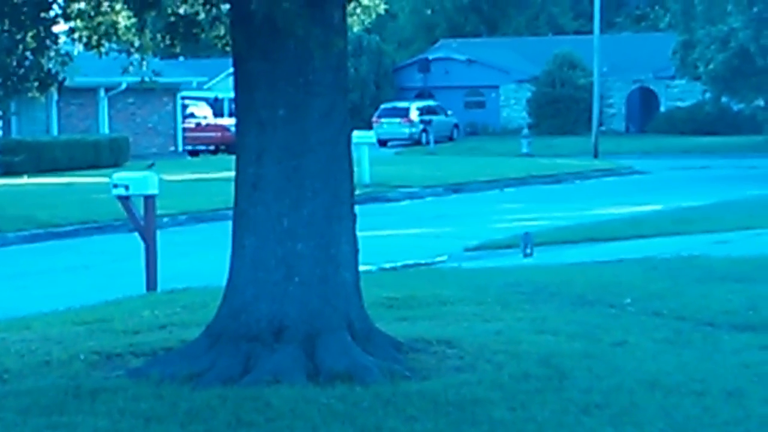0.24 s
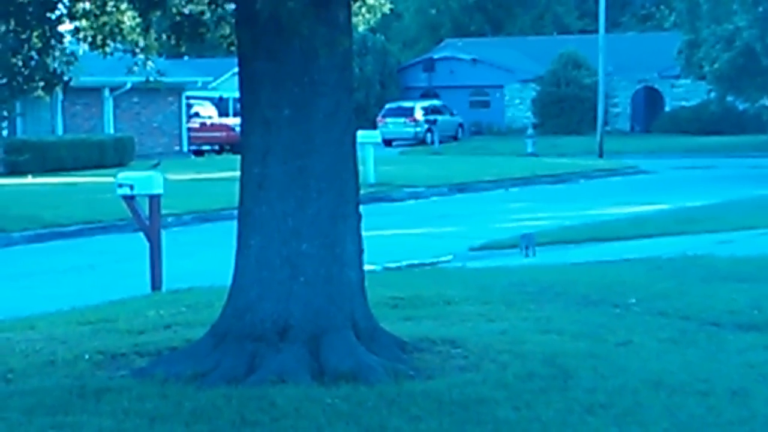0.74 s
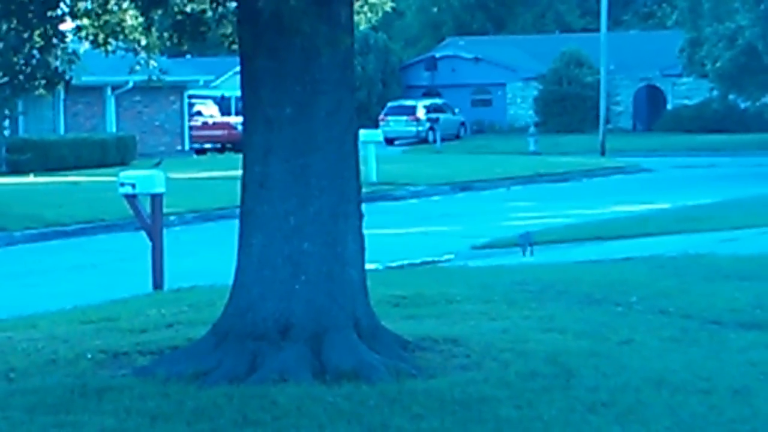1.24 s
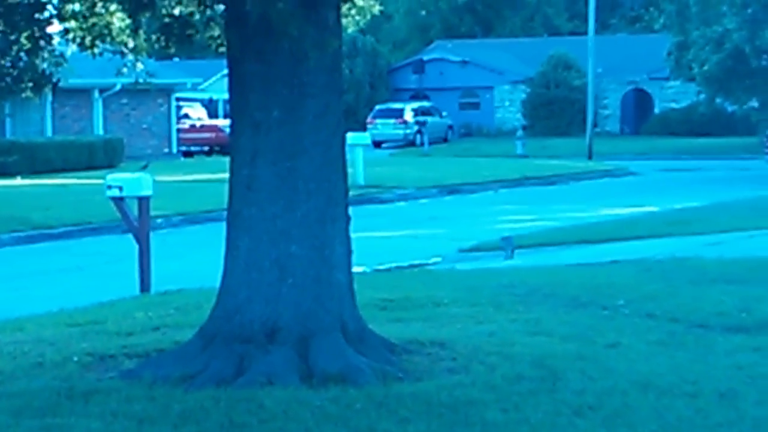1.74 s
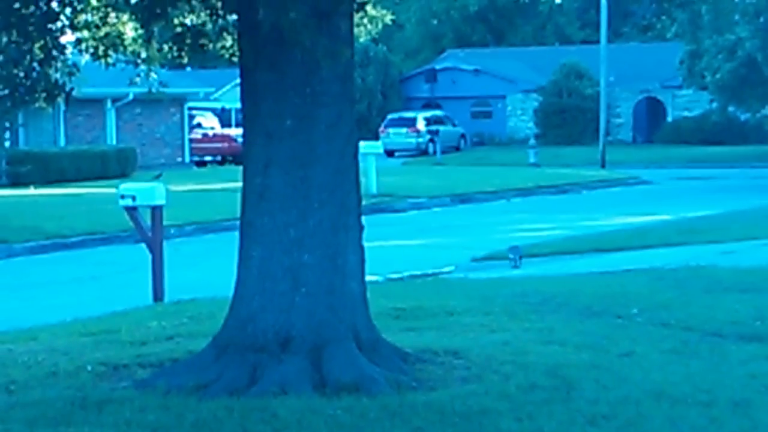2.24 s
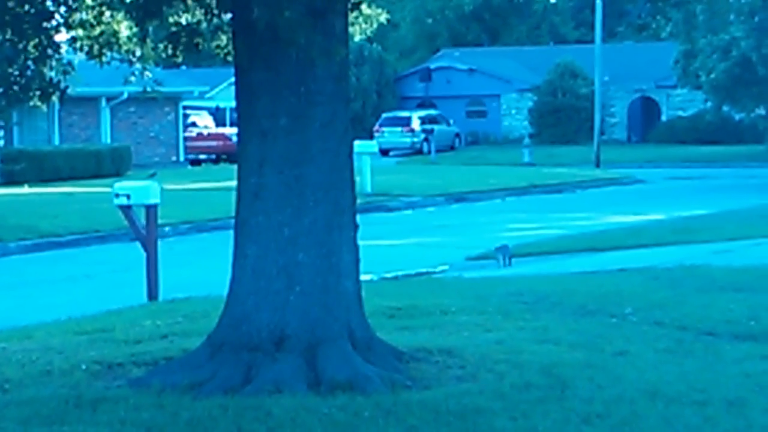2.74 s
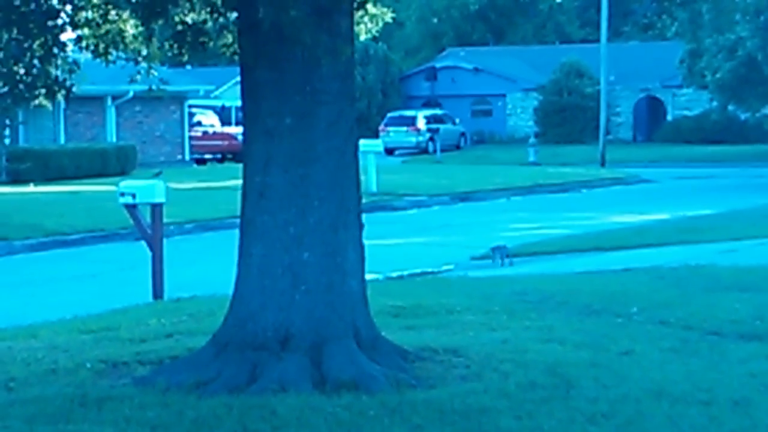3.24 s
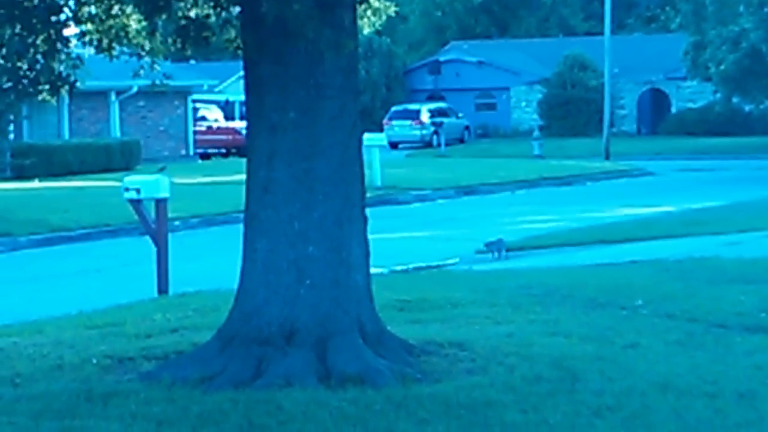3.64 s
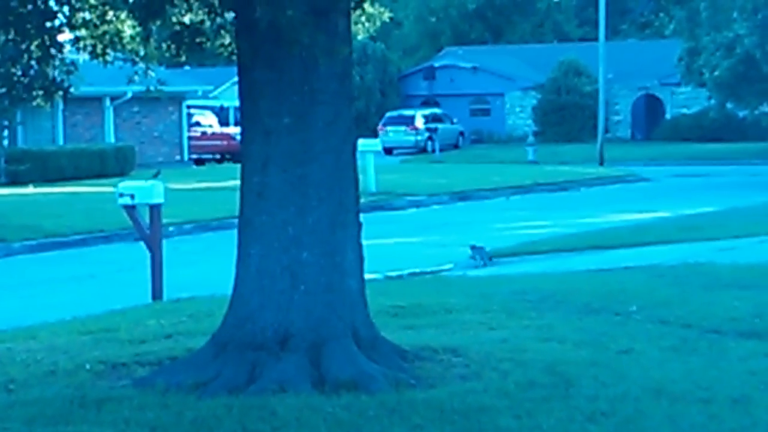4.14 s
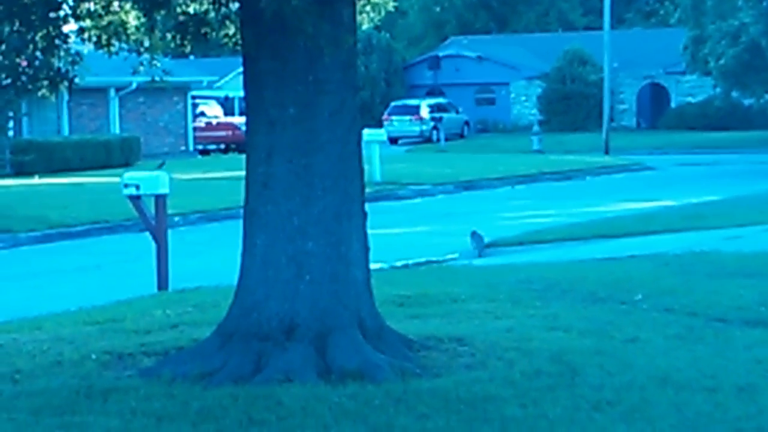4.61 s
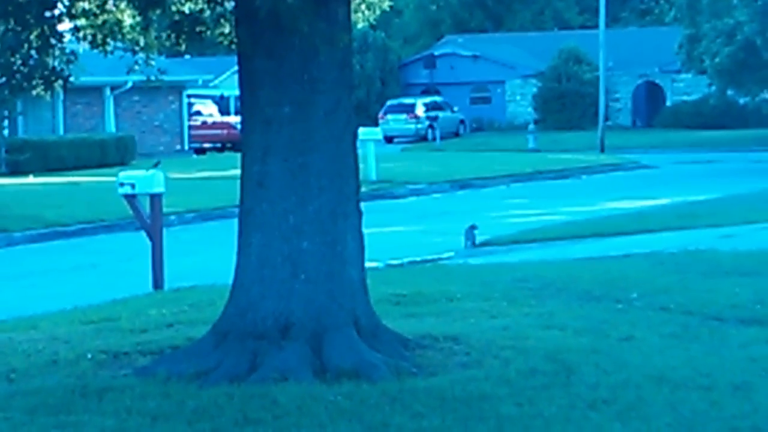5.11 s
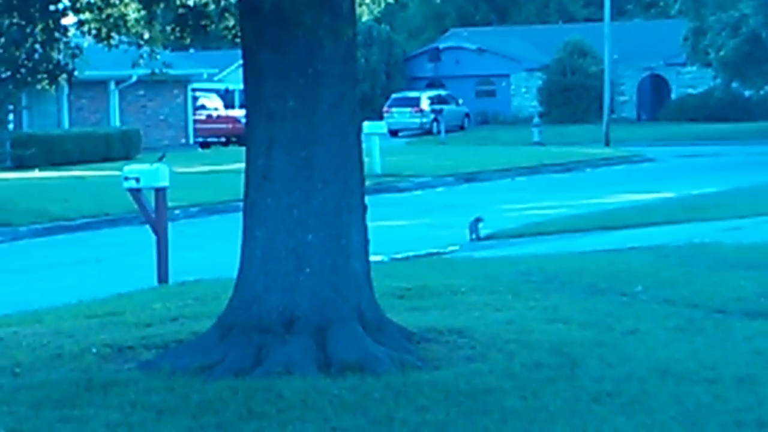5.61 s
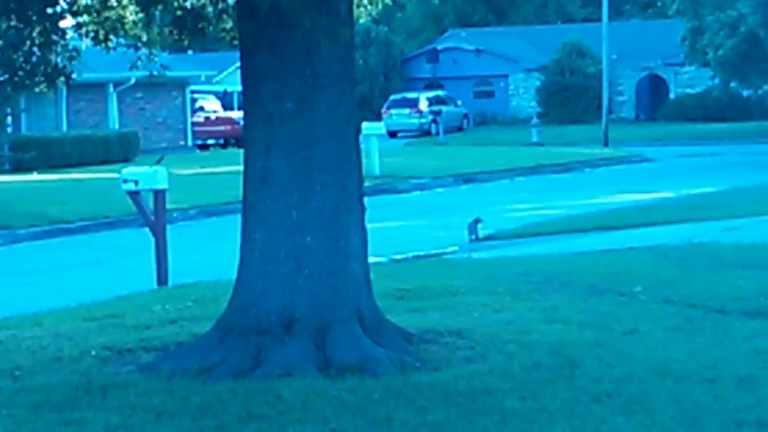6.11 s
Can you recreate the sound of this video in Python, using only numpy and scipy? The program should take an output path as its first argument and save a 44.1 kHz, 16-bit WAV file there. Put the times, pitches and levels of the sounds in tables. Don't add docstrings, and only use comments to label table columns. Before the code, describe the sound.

A quiet suburban street through a small mono microphone: low wind bumps, faint far traffic, a steady low air-conditioner hum, and a heavy vehicle idling softly with a thin air leak. From 0.1 s a songbird gives short sliding whistles. At 0.8 s a jay scolds, a very brief harsh buzzing rasp that darkens as it ends and echoes off house fronts. More whistles follow, with a dull knock near 1.25 s and a soft air puff at 1.7 s. Around 1.95 s a brake valve cracks, blows a sharp hiss at 2.0 s, then squeaks very high at 2.3 s. The second scold comes at 2.55 s. Small valve puffs, faint distant chirps and stronger wind thumps near 3.9 and 4.5 s fill the gap. The third scold, at 4.65 s, echoes most. Sparse far birds chirp around 5.6-5.9 s; the loudest, driest scold lands at 6.25 s, just before the end.

```python
import sys
import numpy as np
from scipy import signal
from scipy.fft import rfft, irfft, next_fast_len
from scipy.io import wavfile
from scipy.ndimage import uniform_filter1d, map_coordinates

SR = 44100
rng = np.random.default_rng(int(sys.argv[2]) if len(sys.argv) > 2 else 0)


def to_wav(sig):
    pcm = np.clip(np.atleast_2d(sig), -1, 1) * 32767
    pcm = np.round(pcm).astype(np.int16)
    wavfile.write(sys.argv[1], SR, pcm.T)


def gain_from_decibels(decibels):
    exponent = np.asarray(decibels, float) / 20
    return 10 ** exponent


N = 280379

# time_s, level_db
TRAFFIC_LEVEL = [(0, -59), (1.3, -60.5), (1.8, -59.5), (2.6, -62), (4.5, -59), (5.1, -61.5), (6.36, -58.5)]
# pitch_hz, level_db (per Hz)
TRAFFIC_COLOUR = [(100, -42), (170, -4.5), (204, -8), (225, -4), (245, -9.5), (260, -11), (303, -1.5),
                  (386, -9), (540, -12), (757, -23.5), (927, -15.5), (1080, -26), (1340, -20.5),
                  (1570, -33.5), (1700, -32.5), (2210, -57.5), (3740, -120)]
# pitch_hz, level_db (per Hz)
HIGH_FLOOR_COLOUR = [(940, -32), (1600, -10.5), (1880, 2), (2410, -9.5), (2730, -8.5), (3150, -16),
                     (3240, -15), (4620, -10.5), (6210, -11), (8340, -14.5), (11300, -19), (14900, -15.5),
                     (15700, -16)]
# pitch_hz, width_hz, level_db (rms)
HUM = [
    (236.6, 8, -57.5),
    (297.8, 22, -63.5),
]
# time_s, boost_db
FAN_SURGES = [
    (3.79, 8.7),
    (4.19, 13.6),
]
# pitch_hz, level_db (per Hz)
WIND_COLOUR = [(8.8, -46), (15, -10.5), (40, -2.5), (87, 1), (157, -7.5), (168, -13.5), (203, -26.5),
               (220, -15.5), (290, -34.5), (480, -120)]
# start_s, length_s, level_db
GUSTS = [(0.06, 0.044, -50), (0.186, 0.038, -50), (0.715, 0.034, -46), (0.823, 0.095, -41.5),
         (0.99, 0.052, -43.5), (1.07, 0.032, -46), (1.255, 0.035, -46), (1.349, 0.17, -42.5),
         (1.581, 0.03, -47), (1.701, 0.073, -39.5), (1.836, 0.028, -52), (1.898, 0.1, -41.5),
         (2.014, 0.15, -43), (2.434, 0.025, -54), (2.6, 0.12, -49.5), (2.75, 0.066, -45),
         (2.947, 0.039, -50), (3.04, 0.064, -49), (3.458, 0.077, -45.5), (3.574, 0.093, -44),
         (3.855, 0.1, -37.5), (4.034, 0.042, -44), (4.389, 0.032, -41), (4.456, 0.12, -35),
         (5.518, 0.04, -49), (5.567, 0.08, -41.5), (5.711, 0.097, -41.5), (6.152, 0.079, -48.5),
         (6.222, 0.068, -47)]

# time_s, level_db
IDLE_LEVEL = [(0, -51.5), (.2, -53), (.33, -44.5), (.8, -58), (1.09, -53.5), (1.5, -57), (2, -71.5),
              (6.36, -62)]
# time_s, level_db
LEAK_LEVEL = [(0, -62.5), (.4, -65), (.75, -67.5), (1.4, -72.5), (1.9, -70.5), (2.33, -61), (2.55, -70),
              (3.05, -75.5), (3.6, -81), (4.3, -94), (6.36, -92)]
# pitch_hz, level_db (per Hz)
LEAK_COLOUR = [(2350, -35), (4000, -11), (4780, -16), (5170, -6), (6580, -2), (7290, 3), (8080, 4),
               (10800, -7), (15100, -14.5), (15700, -14)]
# start_s, level_db, fade_s (time to fall 60 dB)
PUFFS = [(1.247, -61, .06), (1.71, -60, 0.78), (2.25, -82, .9), (3.12, -73, 0.27), (3.24, -69.5, .6),
         (3.41, -71.5, .5), (3.775, -71.5, 1.4), (4.37, -69.5, 1.6), (6.1, -75, .5)]
# pitch_hz, level_db (per Hz)
PUFF_COLOUR = [(300, -120), (450, 3), (700, 1), (1500, 5), (3000, -10), (5000, -2), (7500, 1.5),
               (10000, -3.5), (13000, -16), (15700, -21)]
# start_s, level_db, pitch_hz, fade_s (time to fall 60 dB)
KNOCK = (1.247, -44, 520, 0.08)
# pitch_hz, level_db (per Hz)
VENT_CHEST = [(210, -33), (350, -16), (438, -2.5), (660, 0), (769, -6), (961, -2), (1380, -5.5),
              (1590, -12), (1970, -9.5), (5410, -25), (5800, -15.5), (7540, -44), (12800, -120)]
# pitch_hz, level_db (per Hz)
VENT_JET = [(3500, -27), (4800, -11), (5600, -32), (6600, 5), (8000, 3), (9000, -6), (11000, -6.5),
            (12800, -21), (14500, -15), (15700, -18)]
# time_s, pitch_hz, level_db
SQUEAK = [(2.25, 11200, -90), (2.262, 11210, -53), (2.29, 11200, -50.5), (2.34, 11230, -53.5),
          (2.44, 11200, -76)]

# pitch_hz, fade_s (time to fall 60 dB)
STREET_FADE = [(1500, 0.46), (3500, 0.64), (6000, 0.62), (8000, 0.64), (11000, 0.73), (15000, 0.76)]
# delay_s, level_db, pitch_hz, width_hz
HOUSES = [(.042, -12, 4900, 1490), (.075, -19, 4000, 1500), (0.109, -11.5, 4380, 3000),
          (.116, -8, 3650, 900), (.2, -19, 4230, 1500), (.214, -12.5, 3540, 587), (.245, -33, 4250, 1200),
          (.356, -19.5, 5180, 500), (0.357, -26, 3900, 396)]
# pitch_hz, level_db
ECHO_COLOUR = [(1500, 3.5), (2600, -6), (3200, -7.5), (3600, -4), (4100, 3), (4700, -6), (5200, -6),
               (5900, -3.5), (8000, 4), (11000, -4.5), (15000, 5)]

# start_s, length_s, start_pitch_hz, end_pitch_hz, level_db (rms)
SONG = [(0.111, 0.05, 2170, 2040, -62.5), (0.261, 0.07, 2710, 3150, -59.5), (0.317, .06, 2580, 2414, -58.5),
        (0.386, 0.053, 2420, 2275, -70), (0.432, .025, 2257, 2225, -55), (0.714, 0.038, 3600, 3220, -65),
        (0.744, 0.028, 3150, 2890, -52), (0.767, 0.071, 2600, 2556, -46.5), (0.863, 0.013, 1700, 1780, -56),
        (1.128, 0.14, 2137, 1978, -56), (1.242, 0.037, 2468, 2350, -63.5),
        (1.271, 0.038, 2320, 1953, -50.5), (1.633, 0.062, 3070, 2700, -56),
        (1.661, 0.043, 2650, 2604, -46.5), (1.746, 0.052, 3005, 2760, -53), (1.774, 0.052, 2626, 2660, -43),
        (1.81, .08, 2567, 2396, -55.5), (2.185, 0.018, 2110, 2130, -66), (2.279, 0.086, 2457, 2508, -57),
        (2.36, .04, 3270, 3240, -62), (2.406, 0.052, 3220, 3120, -61.5), (2.446, 0.017, 2750, 3000, -54.5),
        (2.465, 0.019, 2650, 2550, -56.5), (2.475, .016, 2320, 2230, -63)]
# start_s, length_s, start_pitch_hz, end_pitch_hz, level_db (rms)
FAR_BIRDS = [(.054, 0.035, 3050, 2900, -76), (.97, 0.18, 509.5, 486.6, -64.5),
             (3.355, .06, 7150, 7000, -78), (3.657, .05, 2225, 2210, -71.5), (3.683, .03, 5950, 5250, -65),
             (3.728, 0.04, 2760, 2700, -73), (3.77, .05, 2650, 2430, -74), (5.63, 0.067, 2150, 2150, -74),
             (5.625, .08, 802, 906, -73), (5.718, .05, 2770, 2640, -77), (5.8, 0.059, 2220, 2120, -72),
             (5.874, .1, 2820, 2540, -76)]
# start_s, length_s, start_pitch_hz, end_pitch_hz, level_db (rms)
CHIPS = [(0.295, .055, 3210, 2900, -68), (3.679, .05, 5870, 5280, -69), (5.5, 0.052, 4600, 4500, -79.5),
         (5.798, .05, 3700, 4100, -81)]
FLUTTER = (0.39, .3, 0.74)

# start_s, peak_db, breath_hiss_db, length_stretch (ratio), house_echoes_db
SCOLDS = [
    (0.7766, -22, -0.5, 0.95, -5.5),
    (2.5539, -24, 1, 0.98, -1),
    (4.66, -22.5, -2, 0.96, 1.5),
    (6.2453, -18.5, 0.5, 0.92, -9.5),
]
# pitch_hz, width_hz, level_db
BEAK_WIDE = [(4275, 400, -4), (4660, 400, 1), (5150, 780, -3)]
# pitch_hz, width_hz, level_db
BEAK_HALF = [(3090, 244, -7), (3280, 274, -1), (3540, 250, 2), (3785, 207, 2), (3930, 310, -2)]
# pitch_hz, width_hz, level_db
BEAK_SHUT = [(1983, 120, -4.5), (2320, 113, -5), (2580, 140, -2), (3000, 64, -1)]
# pitch_hz, width_hz, level_db
BREATH_HISS = [(6020, 330, -2), (7640, 1320, 0), (8560, 840, 2.5), (11250, 1100, -5), (14500, 1800, -17.5)]
# loudest_s (after onset), level_db, swell_db_per_s, fade_db_per_s
POSTURES = [
    (.015, -2.5, 700, 620),
    (0.026, -2.5, 435, 524),
    (0.0382, -8.5, 1500, 420),
    (0.025, -10.5, 330, 417),
]


def unit(x):
    return x / np.sqrt(np.mean(x ** 2) + 1e-20)


def along(points, hz):
    f, v = np.transpose(points)
    return np.interp(np.log(hz + 1), np.log(f + 1), v)


def curves(rows, off=None):
    s, *cols = np.transpose(rows)
    return [np.interp(np.arange(N) / SR, s, c, left=off, right=off) for c in cols]


def wobble(rate, size=N):
    knots = rng.standard_normal(int(size * rate / SR) + 4)
    return map_coordinates(knots, [np.arange(size) * rate / SR])


def bell(s, width_s):
    return np.exp(-((np.arange(N) / SR - s) / width_s) ** 2)


def add(out, x, s):
    part = out[round(s * SR):][:len(x)]
    part += x[:len(part)]


def filtered(x, response):
    m = next_fast_len(len(x) + 8192)
    return irfft(rfft(x, m) * response(np.fft.rfftfreq(m, 1 / SR)), m)[:len(x)]


def resonances(modes):
    low = min(modes)[0]

    def response(f):
        edge = (f * f / (f * f - 0.63 * low * low - 1j * f * low)) ** 2
        total = 0
        for k, (centre, width, db) in enumerate(sorted(modes)):
            ring = 1j * f * width / (centre * centre - f * f + 1j * f * width)
            total = total + (-1) ** k * gain_from_decibels(db) * ring
        return edge * total
    return response


def rush(spectrum, patchy_db):
    z = signal.stft(rng.standard_normal(N + 512), nperseg=512)[2]
    patches = uniform_filter1d(rng.standard_normal(z.shape), 6, 0)
    patches = unit(uniform_filter1d(patches, 12, 1))
    x = signal.istft(z * gain_from_decibels(patchy_db * patches), nperseg=512)[1][:N]
    return unit(filtered(x, lambda hz: gain_from_decibels(along(spectrum, hz))))


def husky(hz, db, width_hz):
    turn = 2 * np.pi * np.cumsum(hz) / SR
    return gain_from_decibels(db) * (wobble(width_hz) * np.sin(turn) + wobble(width_hz) * np.cos(turn))


def town():
    steady, wavering = (husky(np.full(N, hz), db, width_hz=width) for hz, width, db in HUM)
    pitch_hz, _, level_db = HUM[0]
    pure = gain_from_decibels(level_db + 2) * np.sin(2 * np.pi * pitch_hz * np.arange(N) / SR)
    surge_db = sum(db * bell(s, 0.056) for s, db in FAN_SURGES)
    traffic = gain_from_decibels(curves(TRAFFIC_LEVEL)[0] + 4.0) * rush(TRAFFIC_COLOUR, patchy_db=2.5)
    high_floor = gain_from_decibels(-70.5) * rush(HIGH_FLOOR_COLOUR, patchy_db=0.84)
    return 0.24 * steady + pure + gain_from_decibels(surge_db) * wavering + traffic + high_floor


def wind():
    thumps = sum(gain_from_decibels(db - 3.0) * bell(s + length / 2, 0.38 * length) for s, length, db in GUSTS)
    breeze = gain_from_decibels(-54.5 + 2.5 * wobble(9))
    return (breeze + thumps) * unit(gain_from_decibels(1.34 * wobble(25)) * rush(WIND_COLOUR, patchy_db=0.83))


def engine_idle():
    turn = 2 * np.pi * np.cumsum(150 + 2.65 * wobble(6)) / SR
    return gain_from_decibels(curves(IDLE_LEVEL)[0]) * np.sqrt(2) * np.sin(turn)


def air_leak():
    return gain_from_decibels(curves(LEAK_LEVEL)[0] - 0.5) * rush(LEAK_COLOUR, patchy_db=0.5)


def valve_puffs():
    t = np.arange(N) / SR
    puffing = sum((t > s) * gain_from_decibels(db - 60 * np.abs(t - s) / fade_s) for s, db, fade_s in PUFFS)
    return puffing * rush(PUFF_COLOUR, patchy_db=-4.0)


def chassis_knock():
    start_s, level_db, pitch_hz, fade_s = KNOCK
    after = np.maximum(np.arange(N) / SR - start_s, 0)
    return gain_from_decibels(level_db - 60 * after / fade_s) * np.sin(2 * np.pi * pitch_hz * after)


def brake_vent():
    crack_s, blow_s, snap_s = 1.937, 2.01, 0.0021
    t = np.arange(N) / SR
    since = np.maximum(t - blow_s, 0)
    crack = np.clip((t - crack_s) / (3 * snap_s), 0, 1) * (t < blow_s) * gain_from_decibels(-51.5)

    def blow(drain_share):
        return np.clip(since / snap_s, 0, 1) * gain_from_decibels(-35.5 - drain_share * 147 * since)

    chest = (crack + blow(1)) * gain_from_decibels(0.74 * wobble(160)) * rush(VENT_CHEST, patchy_db=1.5)
    jet = (gain_from_decibels(-6) * crack + gain_from_decibels(0.5) * blow(0.98)) * rush(VENT_JET, patchy_db=3.0)
    valve_hz = 6700 + 1330 * np.exp(-since / 0.029)
    swell_db = 20 * np.log10(1 - np.exp(-since / 0.02) + 1e-4)
    valve_db = -36.5 - 127 * since + swell_db
    whistle = husky(valve_hz, valve_db, width_hz=260)
    overtone = husky(2 * valve_hz, 1.86 * valve_db + 25, width_hz=1300)
    return chest + jet + whistle + overtone


def brake_squeak():
    squeak_hz, squeak_db = curves(SQUEAK)[0], curves(SQUEAK, off=-120)[1]
    slip = np.clip((np.arange(N) / SR - 2.285) / 0.018, 0, 1)
    clear = (1 - 0.51 * slip) * gain_from_decibels(squeak_db + 8) * np.sin(2 * np.pi * np.cumsum(squeak_hz) / SR)
    rough = (0.19 + slip) * husky(squeak_hz + 40, squeak_db + 0.5, width_hz=330)
    scour = bell(2.36, 0.14) * husky(np.full(N, 13500), -69, width_hz=3600)
    return clear + rough + scour


def vehicle():
    running = engine_idle() + air_leak() + valve_puffs() + chassis_knock()
    return running + brake_vent() + brake_squeak()


def tail(seconds, hasten):
    hz, t, z = signal.stft(rng.standard_normal(int(seconds * SR)), SR, nperseg=256)
    fade_s = along(STREET_FADE, hz)[:, None]
    h = signal.istft(z * gain_from_decibels(-60 * t * hasten / fade_s), SR, nperseg=256)[1]
    return h / np.linalg.norm(h)


def street(x, wet_db, fronts_db, hasten):
    room = np.pad(gain_from_decibels(wet_db) * tail(0.87, hasten), (int(.008 * SR), 0))
    t = np.arange(300) / SR
    for delay, db, hz, width in HOUSES:
        wall = 2 * np.pi * width / SR * np.exp(-np.pi * width * t) * np.cos(2 * np.pi * hz * t)
        wall += 0.037 * rng.standard_normal(len(t)) * gain_from_decibels(-60 * t / 0.01)
        add(room, gain_from_decibels(db + fronts_db) * wall, delay)
    wet = signal.fftconvolve(x, filtered(room, lambda hz: gain_from_decibels(along(ECHO_COLOUR, hz))))
    return wet + np.pad(x, (0, len(wet) - len(x)))


def whistles():
    out = np.zeros(N)
    for notes, flutter in zip((SONG, FAR_BIRDS, CHIPS), FLUTTER):
        for s, length, from_hz, to_hz, db in notes:
            u = np.linspace(0, 1, int(length * SR))
            size = len(u)
            glide = from_hz + (to_hz - from_hz) * u
            pitch = glide * (1 + .09 * flutter ** 3 * wobble(417, size=size))
            swell = (1 - np.exp(-u / 0.17)) * (1 - u) ** 0.32
            swell *= 1 + 0.83 * flutter * (wobble(64.6, size=size) + wobble(238, size=size))
            add(out, 1.79 * gain_from_decibels(db) * swell * np.sin(2 * np.pi * np.cumsum(pitch) / SR), s)
    heard, size = np.zeros(N), round(1.6 * SR)
    for k in range(0, N, size):
        add(heard, street(out[k:k + size], wet_db=1.5, fronts_db=-4, hasten=2.4), k / SR)
    return heard


def jay():
    out, size = np.zeros(N), SR // 8
    t = np.arange(size) / SR
    wide = resonances(BEAK_WIDE)
    throats = (lambda f: wide(f) ** 2, resonances(BEAK_HALF), resonances(BEAK_SHUT), resonances(BREATH_HISS))
    for start, db, hiss_db, stretch, echo_db in SCOLDS:
        u = t / stretch
        pulse_hz = 468 + 3.5 * (db + 22)
        bend = 1 - 0.4 * (t - .02) + .011 * wobble(145.0, size=size)
        turn = 2 * np.pi * np.cumsum(pulse_hz * bend) / SR
        pulses = sum(np.cos(k * turn + 0.286 * k * k) for k in range(4, 14))
        pulses = pulses * gain_from_decibels(1.2 * wobble(265, size=size))
        puffs = rng.standard_normal(size) * (1 + 0.28 * np.cos(turn))
        breath = np.clip(.2 + 35 * (t - .018), .12, .85)
        voice = np.sqrt(1 - breath) * 0.28 * unit(pulses) + np.sqrt(breath) * unit(puffs)
        effort = (1 - np.exp(-t / 0.002)) * gain_from_decibels(-3500 * np.maximum(u - 0.0633, 0))
        open_db = 3.5 + 0.23 * echo_db
        extras_db = (open_db, 0, 0, hiss_db)
        sources = (voice, voice, voice, puffs)
        call = np.zeros(size)
        for throat, posture, extra_db, source in zip(throats, POSTURES, extras_db, sources):
            at, top_db, swell, fade = posture
            drive = effort * gain_from_decibels(top_db + extra_db + np.minimum(swell * (u - at), fade * (at - u)))
            sung = filtered(drive * source, throat)
            call += sung * np.linalg.norm(drive) / np.linalg.norm(sung)
        add(out, gain_from_decibels(db - 7.5) * street(call, wet_db=-6.0, fronts_db=echo_db, hasten=0.74), start)
    return out


def scene():
    return (town() + wind() + vehicle() + whistles() + jay())[None]


def low_pass(x):
    return signal.sosfilt(signal.butter(12, 15820, fs=SR, output="sos"), x)


def record(dry):
    return low_pass(dry)


dry = scene()
out = record(dry)
to_wav(out)
```